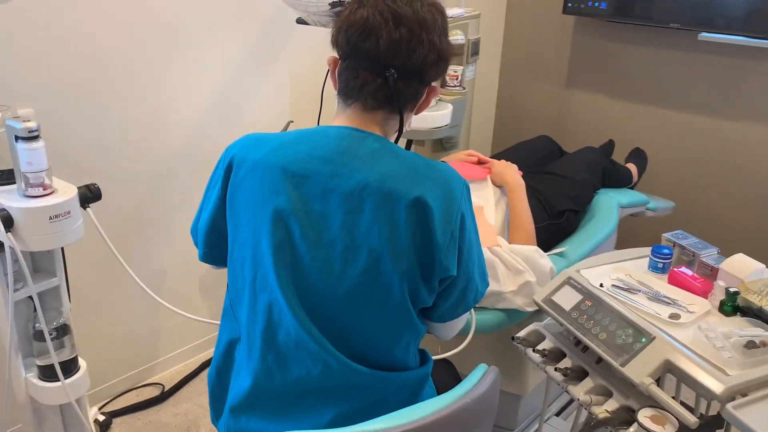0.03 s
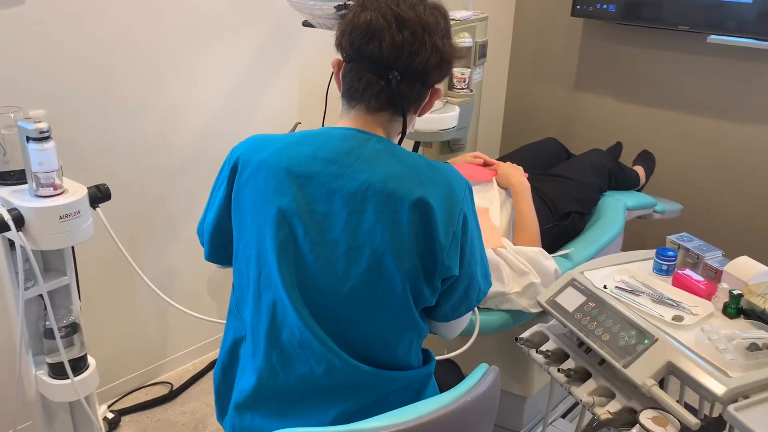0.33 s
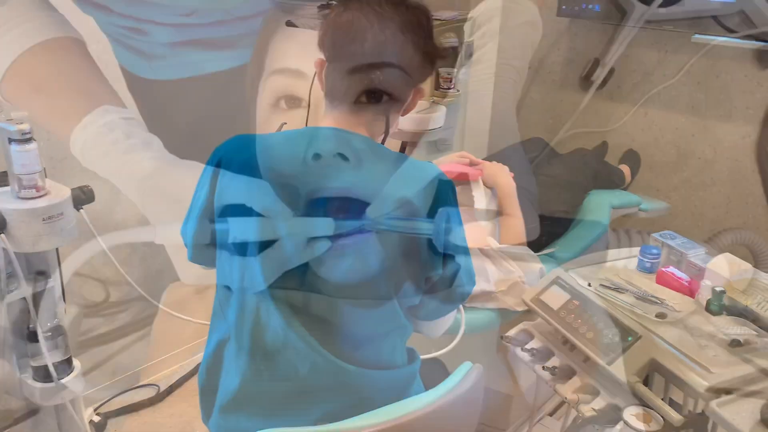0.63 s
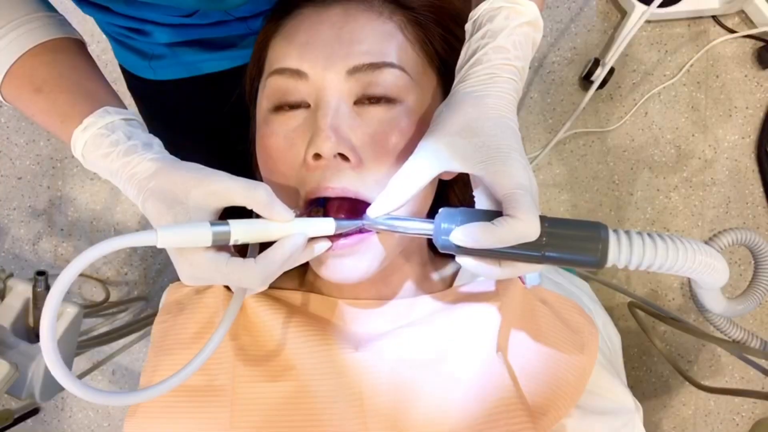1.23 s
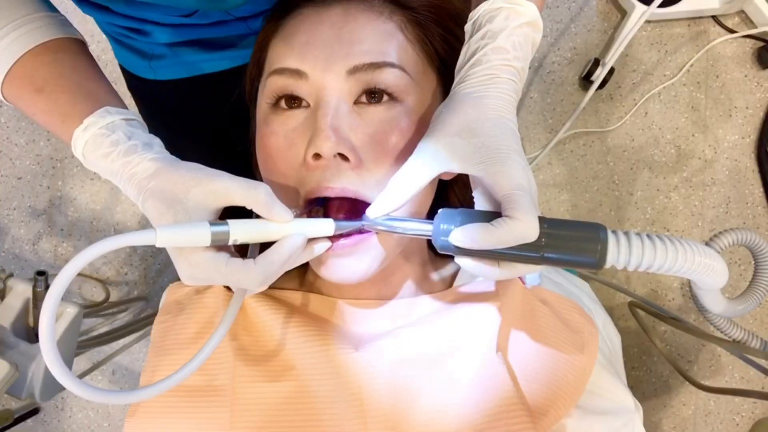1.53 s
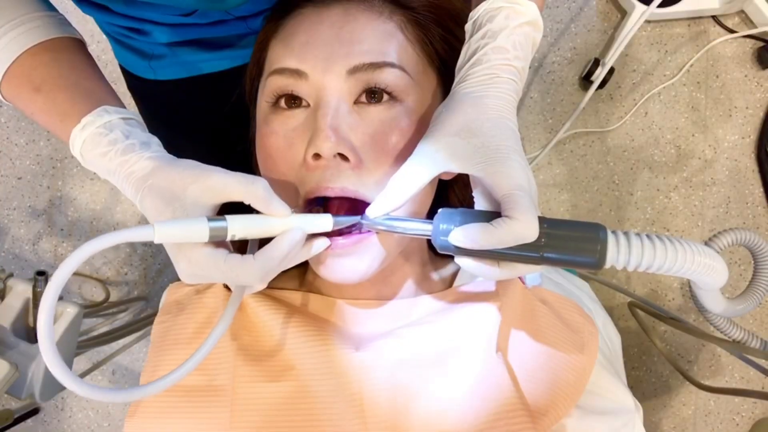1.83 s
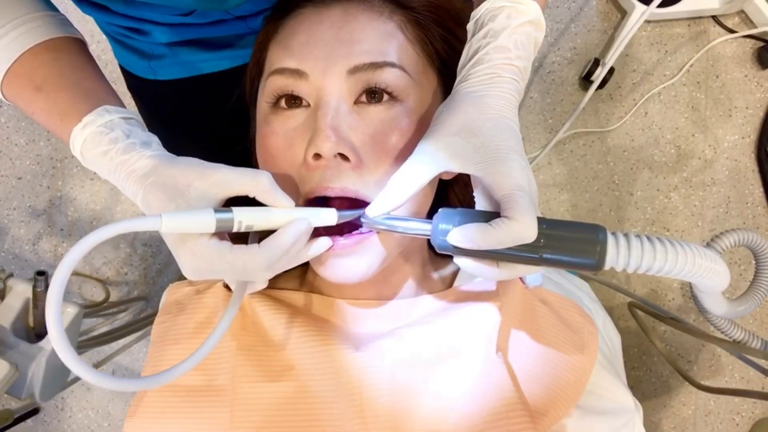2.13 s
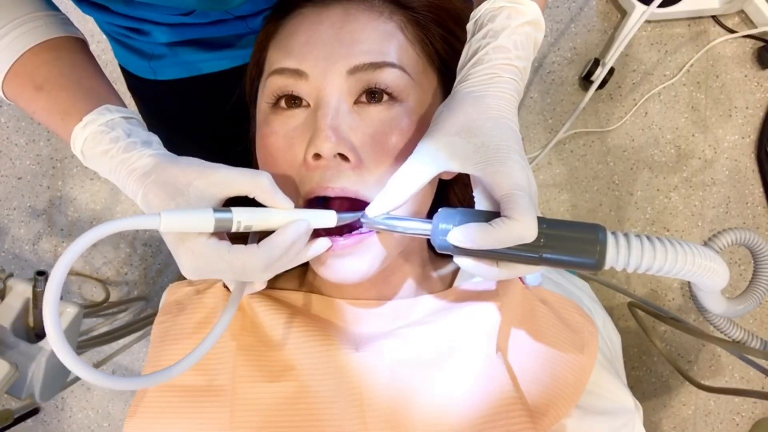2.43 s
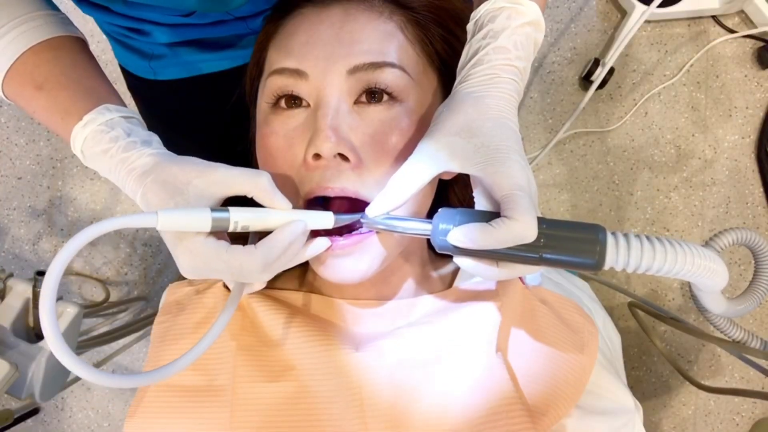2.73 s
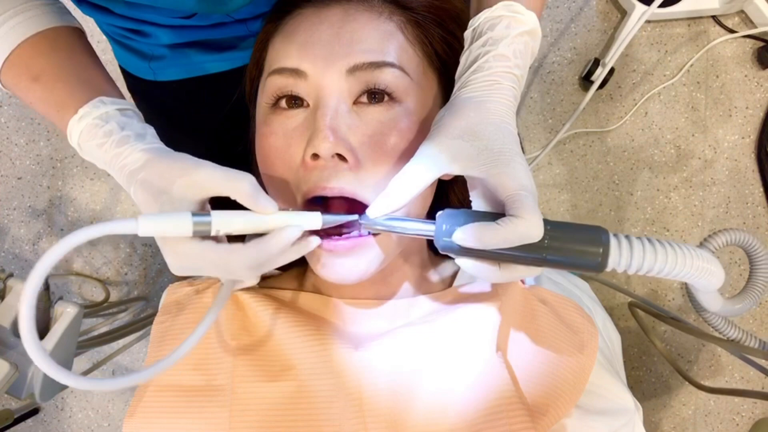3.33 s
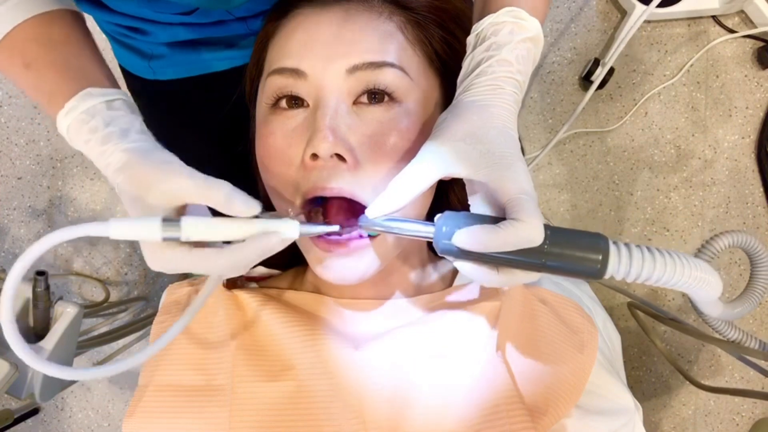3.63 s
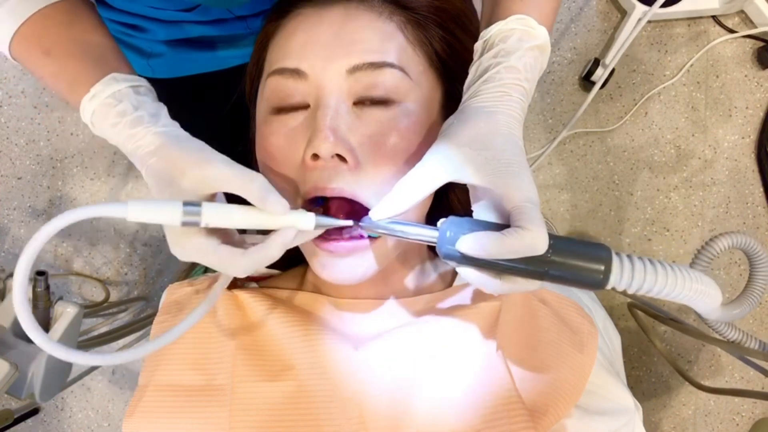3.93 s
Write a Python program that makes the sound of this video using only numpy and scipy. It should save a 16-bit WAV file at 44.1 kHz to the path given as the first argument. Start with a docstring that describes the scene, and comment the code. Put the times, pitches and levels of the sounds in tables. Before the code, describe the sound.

A dental cleaning jet hisses loudly and close, starting with a soft thump after a moment of distant suction in a small clinic. A suction tube roars and flutters beside it, and airy whistles come in near the end.

```python
"""Teeth are cleaned with an air-powder handpiece in a small clinic.
At first a suction tube hisses from across the room, wide, over a low hum.
Then the jet sets in, close and centred, with a soft thump, and the distant sound soon stops.
The jet hisses through the resonances of mouth and nozzle while the suction roars and flutters beside it.
Near the end the nozzle is drawn back: the highest sizzle sinks and fades, and airy whistles come in."""
import sys
import numpy as np
from scipy import signal
from scipy.fft import rfft, irfft
from scipy.io import wavfile
from scipy.ndimage import map_coordinates

SR = 44100
rng = np.random.default_rng(int(sys.argv[2]) if len(sys.argv) > 2 else 0)


def to_wav(s):
    """Save 16-bit WAV."""
    ch = np.atleast_2d(s).T  # columns
    pcm = np.round(np.clip(ch, -1, 1) * 32767)  # PCM
    wavfile.write(sys.argv[1], SR, pcm.astype(np.int16))


N = 176400
T = np.arange(N) / SR
HZ = np.maximum(np.arange(N // 2 + 1) * SR / N, 1)

# How each close sound swells and fades, before its own gain is added: t/s, level/dB
HISS_LEVEL = [(.45, -22), (.56, -23.5), (.63, -22.7), (1.0, -22.5), (1.7, -23), (2.2, -23.5), (2.4, -21.5),
              (2.95, -22.5), (3.3, -24), (3.52, -23), (4, -24.5)]
SPRAY_LEVEL = [(.45, -28.5), (.65, -27.5), (1.1, -28.5), (1.5, -27.5), (1.85, -29), (2.3, -28.5),
               (2.45, -27.5), (3.0, -28.4), (3.22, -29), (3.55, -34.5), (4, -36)]
SIZZLE_LEVEL = [(.45, -28), (.7, -28.5), (1.0, -28.5), (1.4, -29.5), (1.85, -30), (2.1, -29.5),
                (2.7, -29.5), (3.0, -29), (3.15, -29.5), (3.3, -33), (3.42, -55), (4, -50)]
ROAR_LEVEL = [(.45, -30.5), (.7, -26.5), (1.0, -26.5), (1.15, -26.5), (1.4, -24.5), (1.8, -23.5),
              (1.95, -24.5), (2.1, -22.7), (2.45, -24.5), (2.8, -25.5), (2.98, -26), (3.1, -27),
              (3.22, -25), (3.3, -26), (3.6, -23.5), (3.85, -23), (3.92, -25.5), (4, -21.5)]

# The colour of each noise, or how strong its low and high parts are: f/Hz, relative level/dB
HISS_COLOUR = [(900, -33), (1800, -17.5), (2500, -4.5), (2900, -11.5), (3150, 0.5), (3800, 1), (4050, -2),
               (4450, 2), (4830, -4.5), (5400, 1.5), (5850, 1), (6200, -13.5), (8000, -10.5), (11000, -18)]
SPRAY_COLOUR = [(4500, -24.5), (5900, -3.5), (6400, 0.5), (7000, -0.5), (7500, 0.5), (8000, -4),
                (8300, -12), (9300, -11), (10000, -9), (10500, -16.5), (11200, -9), (12300, -9.5),
                (15500, -11)]
SIZZLE_COLOUR = [(9000, -29.5), (10600, -9), (11200, -1.5), (12000, -8), (12500, 1), (13200, -0.5),
                 (14250, -1), (14700, -16), (15600, -9.5)]
ROAR_COLOUR = [(100, -49), (280, -27), (400, -25.5), (550, -19), (680, -24.5), (790, -31.5), (900, -21),
               (1030, -12.5), (1110, -8), (1180, -1.5), (1300, -0.5), (1490, -3), (1570, -8.5),
               (1640, -14.5), (1730, -13.5), (1860, -20), (2350, -16), (2900, -27.5), (6000, -35)]
PUFF_COLOUR = [(50, -30), (100, -1), (160, 0), (270, -6), (400, -16), (800, -37)]
RUMBLE_COLOUR = [(20, -46), (32, -30), (45, -11), (58, 6), (75, -5), (105, 0), (170, -1), (300, -8),
                 (700, -26)]

# Resonances, the pitches at which each noise rings: f/Hz, width/Hz, lift/dB
HISS_PEAKS = [(3275, 51, 4.8), (3600, 99, 7.2), (3720, 93, 2), (4297, 213, 6.4), (4515, 130, 8),
              (5054, 59, 7.8), (5280, 59, 4.7), (5780, 120, 1.3)]
SPRAY_PEAKS = [(6560, 220, 5.5), (7200, 120, 1.4), (7470, 120, 1.8), (7680, 50, 3), (9860, 270, 3.7)]
SIZZLE_PEAKS = [(12400, 220, 4)]
ROAR_PEAKS = [(1203, 89, 1.6), (1315, 59, 0.81), (1455, 130, 1.9), (2048, 29, 7.3), (2210, 22, 7.2),
              (2405, 54, 5.3)]
FAR_PEAKS = [(1530, 210, 9.5), (1920, 74, 5.9), (3030, 280, 9.5), (5860, 220, 2.8)]

# Airy whistles of the moving nozzle: start/s, start of fade/s, f/Hz, width/Hz, level/dB
WHISTLES = [(3.3, 4.1, 11550, 500, -39.5), (3.42, 4.1, 9670, 430, -41), (3.42, 4.1, 3320, 240, -31.5),
            (3.4, 4.1, 4450, 310, -32), (3.78, 4.1, 5700, 450, -28), (0.55, .85, 5500, 800, -30.5)]
# Soft thumps: t/s, base f/Hz, base level/dB, base time to die away by 60 dB/s
THUMPS = [(.425, 162, -29.5, 0.17), (3.18, 101.4, -44, 0.14)]
# The low notes in a thump, compared with its base values: pitch ratio, level/dB, ring time ratio
THUMP_NOTES = [(.9, -0.5, 3.3), (1.1, 4.5, 0.6), (1.55, -7.5, 1.1)]
# The middle of the opening hiss, the part that left and right share: f/Hz, relative level/dB
OPENING_MIDDLE = [(200, -20.5), (420, -14.5), (800, -16), (1300, -7), (1750, -5), (2200, -11.5),
                  (2700, -10.5), (3300, -10), (4400, -13), (5500, -12), (7000, -6), (8300, -14),
                  (10000, -9.5), (11200, -9.5), (12300, -14), (13500, -21), (15500, -13)]
# Side level of the opening hiss, rumble and puff, with two treble bands where the middle thins
# and the sides remain: f/Hz, level/dB compared with the middle
OPENING_SIDE = [(60, -8), (130, -13), (220, -7), (400, -1), (700, 1.5), (1300, -1), (2400, -2), (4400, -8),
                (7000, -3), (8600, 10.5), (11000, -9.5), (13500, -1), (15000, -4)]

JET_ON_S, JET_RISE_S = 0.432, 0.0063
FAR_END_S, FAR_FADE_S = 0.929, 0.022


def jet(hiss_db=0.75, spray_db=1.54, sizzle_db=0.5):
    """The uneven flow of powder shakes a hiss in the mouth, a bright spray and a sizzle at the teeth."""
    flow = drift(53)
    hiss_gain = from_db(hiss_db + in_time(HISS_LEVEL) + 0.46 * flow)
    hiss = air(HISS_COLOUR, HISS_PEAKS, ripple_db=1.3)
    spray_gain = from_db(spray_db + in_time(SPRAY_LEVEL) + 0.27 * flow)
    spray = hand_sway(air(SPRAY_COLOUR, SPRAY_PEAKS, ripple_db=1.0))
    sizzle_gain = from_db(sizzle_db + in_time(SIZZLE_LEVEL) + 0.4 * flow + 0.51 * drift(40))
    sizzle = hand_sway(air(SIZZLE_COLOUR, SIZZLE_PEAKS, ripple_db=1.3))
    return hiss_gain * hiss + spray_gain * spray + draw_back(sizzle_gain * sizzle)


def hand_sway(sound, delay_s=0.0012, sway_s=0.00006, hand_hz=1.3, echo_gain=0.2):
    """A short echo near the nozzle shifts as the hand moves, so the colour of the treble wanders."""
    position = (T - delay_s - sway_s * drift(hand_hz)) * SR
    echo = map_coordinates(sound[0], [position], mode="wrap")
    return rms_one(sound + echo_gain * echo)


def draw_back(sizzle, start_s=3.0, length_s=0.26, drop_hz=1320):
    """The pitch of the sizzle sinks as the nozzle leaves the teeth."""
    cycles = np.cumsum(drop_hz * ramp(start_s, length_s)) / SR
    # slide every frequency down by the same amount
    return np.real(signal.hilbert(sizzle) * np.exp(-2j * np.pi * cycles))


def whistles(fade_s=0.049):
    """Narrow bands of the jet's noise swell as the nozzle moves."""
    out = np.zeros(N)
    for start, end, hz, width, db in WHISTLES:
        band = noise_band(hz, width / 2)
        out += from_db(db) * band * ramp(start, fade_s) * (1 - ramp(end, fade_s))
    return out


def suction(gain_db=0.5, flutter_db=1.28, flutter_hz=60):
    """A hollow roar that flutters as water is drawn in with the air."""
    gain = from_db(gain_db + in_time(ROAR_LEVEL) + flutter_db * drift(flutter_hz))
    return gain * air(ROAR_COLOUR, ROAR_PEAKS, ripple_db=1.0)


def far_suction(level_db=-27.5):
    """Air rushes into the suction tube, heard from across the room."""
    gain = from_db(level_db + 0.32 * drift(15))
    return gain * air(OPENING_MIDDLE, FAR_PEAKS, ripple_db=2.2, wide=True)


def thumps(rise_s=0.015, puff_db=-4.5, puff_decay_s=0.56):
    """Two dull thumps, each a puff of noise and a few low notes that die away."""
    out = np.zeros((2, N))
    for start, hz, db, ring_s in THUMPS:
        age = np.maximum(T - start, 0)
        thump = from_db(puff_db - 60 * age / puff_decay_s) * air(PUFF_COLOUR, wide=start < FAR_END_S)
        for pitch_ratio, note_db, ring_ratio in THUMP_NOTES:
            fade = from_db(note_db - 60 * age / (ring_s * ring_ratio))
            thump += fade * np.sin(2 * np.pi * hz * pitch_ratio * age)
        out += from_db(db) * ramp(start, rise_s) * thump
    return out


def faint_tone(peak_s=3.87, swell_s=0.033, hz=266, level_db=-39):
    """A brief low tone comes and goes under the hiss."""
    swell = np.exp(-((T - peak_s) / swell_s) ** 2)
    return from_db(level_db) * swell * np.sin(2 * np.pi * hz * T)


def room(wide, hum_hz=59, relative_hum_db=-10):
    """The clinic's low rumble, with a weaker hum from the mains power."""
    hum = np.sqrt(2) * np.sin(2 * np.pi * hum_hz * T)
    return air(RUMBLE_COLOUR, wide=wide) + from_db(relative_hum_db) * hum


def air(colour, peaks=(), ripple_db=0, wide=False):
    """The noise of swirling air, shaped by a colour, resonances and the fine ripple that echoes add."""
    db = at_hz(colour)
    for hz, width, lift_db in peaks:
        db = db + lift_db / (1 + (2 * (HZ - hz) / width) ** 2)
    ripple = sum(np.cos(2 * np.pi * HZ * delay_s) for delay_s in rng.uniform(0.003, 0.016, 12))
    middle, side = rfft(rng.standard_normal((2, N))) * from_db(db + ripple_db * rms_one(ripple))
    side = side * from_db(at_hz(OPENING_SIDE)) * wide  # with no side, the sound is centred
    return rms_one(irfft(np.array([middle + side, middle - side]), N))


def noise_band(hz, half_width_hz):
    """Noise that is strongest around one frequency."""
    spectrum = rfft(rng.standard_normal(N)) / (1 + ((HZ - hz) / half_width_hz) ** 2)
    return rms_one(irfft(spectrum, N))


def drift(rate_hz):
    """A random wobble of typical size 1, mostly slower than the given rate."""
    return noise_band(0, rate_hz)


def from_db(db):
    """Turn decibels into a factor to multiply by."""
    return 10 ** (np.asarray(db) / 20)


def rms_one(x):
    """Scale a signal so that its typical size (rms) is 1."""
    return x / np.sqrt(np.mean(x ** 2) + 1e-20)


def in_time(rows):
    """Join rows of t/s, level/dB into a level for every sample."""
    return np.interp(T, *np.transpose(rows))


def at_hz(rows):
    """Join rows of f/Hz, level/dB into a level for every frequency."""
    hz, db = np.transpose(rows)
    return np.interp(np.log(HZ), np.log(hz), db)


def ramp(start_s, length_s):
    """Rise steadily from 0 to 1, then stay there."""
    return np.clip((T - start_s) / length_s, 0, 1)


def scene():
    """The wide, distant sound overlaps the close, centred sound of the tools for half a second."""
    far = far_suction() + from_db(-49.5) * room(wide=True)
    close = jet() + suction() + whistles() + from_db(-62) * room(wide=False)
    far_fade = 1 - ramp(FAR_END_S, FAR_FADE_S)
    close_rise = ramp(JET_ON_S, JET_RISE_S)
    return far_fade * far + close_rise * close + thumps() + faint_tone()


def record(dry, cutoff_hz=15620):
    """The very highest treble is cut off steeply."""
    return irfft(rfft(dry) / np.sqrt(1 + (HZ / cutoff_hz) ** 400), N)


dry = scene()
out = record(dry)
to_wav(out)
```